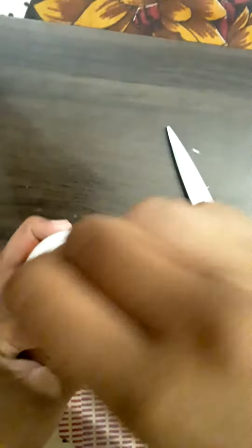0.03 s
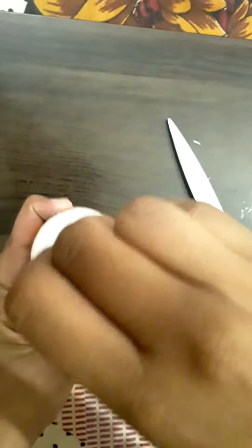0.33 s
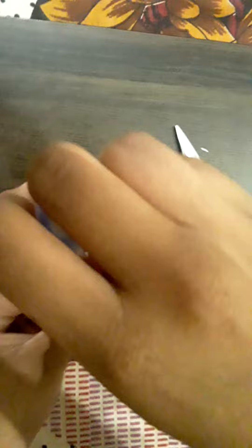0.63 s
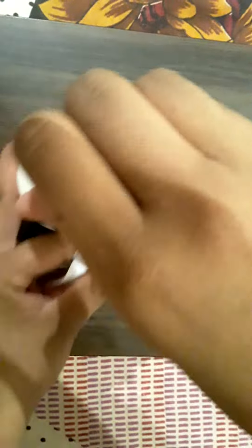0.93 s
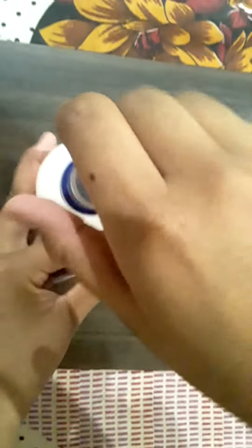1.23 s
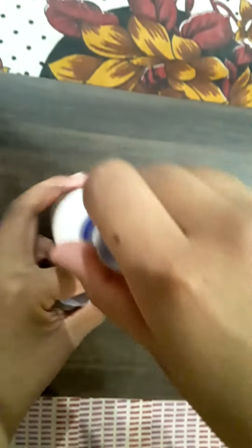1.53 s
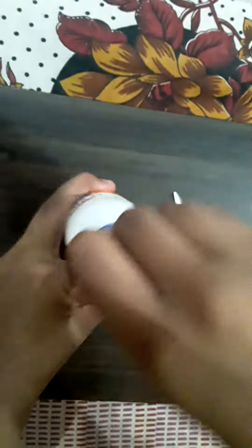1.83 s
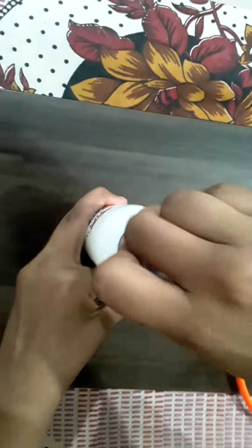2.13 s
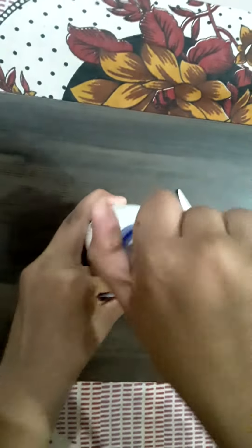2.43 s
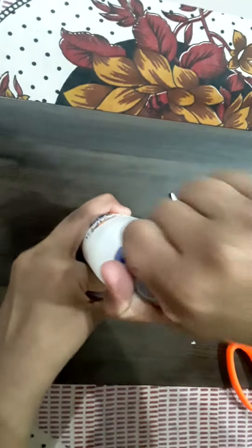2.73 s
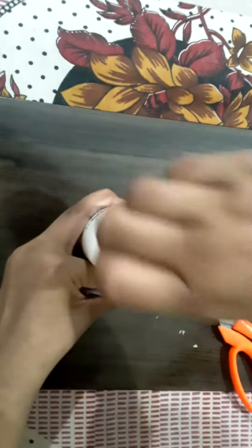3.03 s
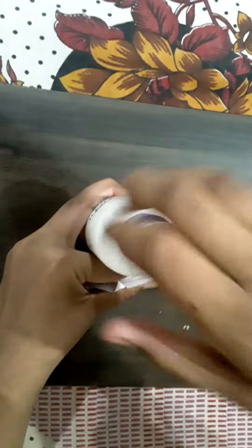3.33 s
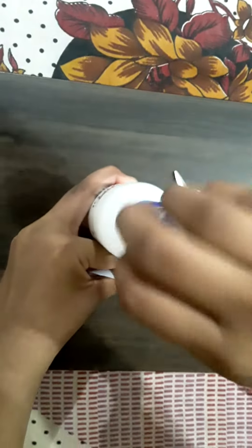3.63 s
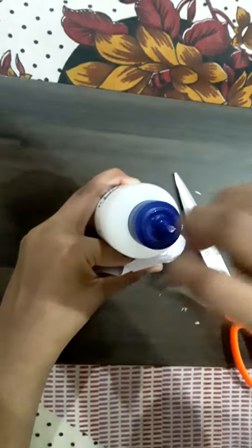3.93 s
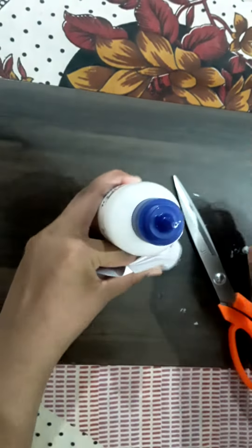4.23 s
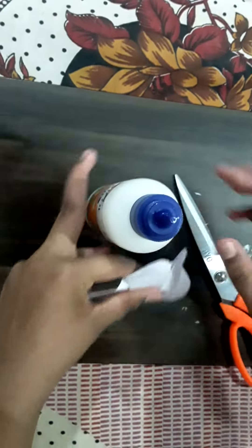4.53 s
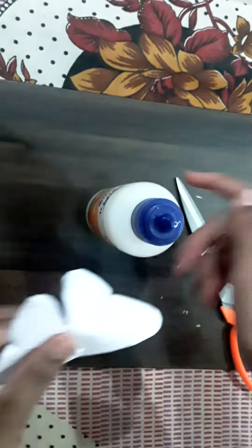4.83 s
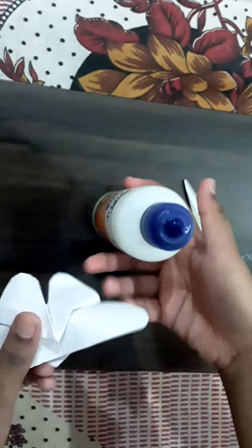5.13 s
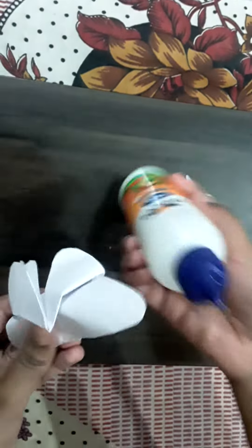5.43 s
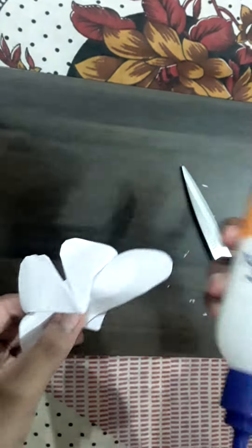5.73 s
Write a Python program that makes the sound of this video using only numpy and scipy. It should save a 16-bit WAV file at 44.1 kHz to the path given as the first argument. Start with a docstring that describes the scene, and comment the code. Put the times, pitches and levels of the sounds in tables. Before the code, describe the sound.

Hands quietly work paper against a plastic glue bottle, making tiny rubs, light clicks and soft bumps on a wooden tabletop over a fan-like hiss. Then steel scissors hit the table with a sharp clack, bounce and settle, echoing briefly in the bare room. The knock overloads the close microphone and the hiss drops, returning as faint high ticks, sliding paper and last finger rubs finish.

```python
"""A bare room with a steady airy hiss. Hands press paper onto a plastic glue bottle over a wooden table:
skin rubs in tiny slips, fingers tick on the plastic, and the bottle rocks on its base.
At four seconds scissors land with one sharp knock, steel and tabletop ringing, then rattle and settle.
The knock overloads the near microphone, whose gain control ducks the hiss for over a second.
Faint, very high ticks follow, the paper slides on the wood, and a few last rubs and ticks close."""
import sys
import numpy as np
from scipy import signal
from scipy.fft import rfft, irfft, next_fast_len
from scipy.io import wavfile
from scipy.ndimage import uniform_filter1d, minimum_filter1d

SR = 44100
rng = np.random.default_rng(int(sys.argv[2]) if len(sys.argv) > 2 else 0)


def put_to_file(sound):
    """Save the sound as 16-bit audio at rate SR, in the file named by the first command-line argument."""
    columns = np.atleast_2d(sound).T  # one column per channel
    safe = np.clip(columns, -1, 1)
    whole_steps = np.round(safe * 32767)
    wavfile.write(sys.argv[1], SR, whole_steps.astype(np.int16))


N = 259749

# Modes of the bottle, the tabletop and its low thump. Each row: pitch in Hz, width in Hz, level in dB.
BOTTLE_MODES = [(2617, 190, -16), (3476, 1200, -17.5), (4460, 1100, -16), (6160, 1330, 2), (7150, 310, 0.5)]
TABLE_MODES = [(200.7, 12, -22), (292.4, 41, -1.5), (380.5, 18, -5), (456, 58, 2), (629, 82, 5),
               (1008, 74, -3.5), (1373, 620, -13)]
THUMP_MODES = [(98, 96, -1.5), (163, 260, 2.2)]
# The tone of a hard contact. Each row: frequency in Hz, level in dB.
CRACK_EQ = [(100, -21.5), (400, -17.5), (750, -21.5), (1100, -5), (2000, -2), (3000, -1), (5000, 1),
            (7400, 0.5), (8400, -4), (9500, -13), (13000, -12.5), (15500, -12)]
# Each pair of sliding surfaces: favoured band in Hz, its lift in dB, treble shelf in dB.
SKIN_ON_PAPER = (4100, 2.4, 0)
SKIN_ON_BOTTLE = (3060, 16, -7.5)
PAPER_ON_WOOD = (6420, 8.9, 0)


def scissors(crack_db=-5, clack_db=-5, blur=1.5, skid_db=-22, skid_s=.0014, bounce_room_db=-13):
    """Steel blades and plastic handles strike the wood with a click, then ring briefly."""
    # The steel lands. Each row: start in seconds, then steel, tabletop, thump and room send in dB.
    knocks = [(3.994, 29, -7, -3, -9), (4.2538, 8, -19.5, -51, -8.5)]
    # The handles bounce. Each row: start in seconds, handle level in dB, tabletop level in dB.
    bounces = [(4.1385, -1.5, -18.5), (4.167, -8, -31), (4.1873, -8.5, -20), (4.306, -16.5, -25)]
    # Modes of the blades and the handles. Each row: pitch in Hz, width in Hz, level in dB.
    steel_modes = [(2820, 310, -17), (3490, 480, -13), (4490, 380, -10.5), (5040, 470, -8),
                   (5700, 300, -11), (6194, 450, -5.5), (7220, 516, 0), (7580, 475, -1.5),
                   (8140, 480, -17.5)]
    handle_modes = [(1098, 540, -40), (2030, 160, -4), (2800, 140, 4.5), (4000, 240, -6), (5030, 320, -18),
                    (6600, 1100, -5)]
    for start, db, table_db, thump_db, room_db in knocks:
        blow = amp(db + crack_db) * click() + amp(table_db) * ring(TABLE_MODES)
        blow += amp(thump_db) * ring(THUMP_MODES)
        skid = amp(skid_db) * burst(CRACK_EQ, skid_s)  # a faint scrape, heard only close by
        close = blow + amp(db) * (ring(steel_modes) + skid)
        send = amp(room_db) * (blow + amp(db) * wall_ring(steel_modes, blur))
        yield start, close, send
    for start, db, table_db in bounces:
        blow = amp(db + clack_db) * click() + amp(table_db) * ring(TABLE_MODES)
        skid = amp(skid_db + 10) * burst(CRACK_EQ, skid_s)
        close = blow + amp(db) * (ring(handle_modes) + skid)
        send = amp(bounce_room_db) * (blow + amp(db) * wall_ring(handle_modes, blur))
        yield start, close, send


def finger_ticks(snap_db=-2, ring_db=-4, grit_db=-17, grit_s=0.0011, room_db=-9):
    """The thin bottle ticks as fingers slip for an instant: a nail is bright, a fingertip dull."""
    # Each row: start in seconds, level in dB, treble shelf in dB.
    ticks = [(.245, -40, 1), (.4685, -39.5, -7), (0.667, -35, -3), (0.782, -30.5, 10.5), (1.829, -31, -14),
             (2.313, -41, -1), (2.774, -19, 10.5), (3.04, -37.5, -3), (3.164, -42, -2), (5.571, -41, 7),
             (5.6225, -45, -1)]
    for start, db, treble_db in ticks:
        tick = amp(ring_db) * ring(BOTTLE_MODES) + amp(snap_db) * click()
        tick += amp(grit_db) * burst(CRACK_EQ, grit_s)
        tick = amp(db) * treble_shelf(tick, treble_db, shelf_hz=9300)
        yield start, tick, amp(room_db) * tick


def bottle_rocking(scuff_db=-7, scuff_s=0.0044, plastic_db=-11, land_s=.006, thump_db=-16, room_db=-9):
    """The bottle's rim scuffs the wood, then its base lands and the table rings."""
    # Each row: start in seconds, contact level in dB, tabletop level in dB.
    nudges = [(3.7365, -29, -29), (3.785, -35, -52.5), (3.81, -31, -50.5)]
    # The tone of a soft scuff. Each row: frequency in Hz, level in dB.
    scuff_eq = [(100, -4), (600, -4.5), (1300, -0.5), (2500, -14.5), (4000, -12.5), (7500, -24),
                (9500, -42)]
    landing = ring(TABLE_MODES) + amp(thump_db) * ring(THUMP_MODES)
    for start, db, table_db in nudges:
        scuff = amp(scuff_db) * burst(scuff_eq, scuff_s)
        bump = amp(db) * (scuff + amp(plastic_db) * ring(BOTTLE_MODES))
        add(bump, land_s, amp(table_db) * landing)
        yield start, bump, amp(room_db) * bump


def rubbing(slips_per_s=900, smooth=0.54, grip_db=2.5, focus_octaves=0.45, room_db=-4,
            attack_s=0.032, release_share=0.36):
    """Each stroke is a swell of tiny slips under a wavering grip that takes hold, then eases off."""
    # The tone of sliding. Each row: frequency in Hz, level in dB.
    slide_eq = [(300, -22), (1500, -12.5), (3000, -2.5), (5000, 1.5), (6300, 2.5), (7400, 7.5),
                (8300, -8.5), (9400, -18.5), (13000, -8.5), (15800, -9.5)]
    # Each row: start in seconds, length in seconds, level in dB, pair of surfaces.
    strokes = [(0, 0.29, -69, SKIN_ON_PAPER), (0.518, 0.36, -56, SKIN_ON_PAPER),
               (0.685, 0.085, -54, SKIN_ON_PAPER), (0.852, .045, -55, SKIN_ON_PAPER),
               (0.876, 0.18, -65.5, SKIN_ON_PAPER), (2.6, 0.51, -67.5, SKIN_ON_PAPER),
               (2.936, 0.18, -61, SKIN_ON_BOTTLE), (3.146, 0.065, -58.5, SKIN_ON_BOTTLE),
               (3.44, 0.053, -57, SKIN_ON_BOTTLE), (3.641, 0.044, -53.5, SKIN_ON_BOTTLE),
               (4.733, 0.31, -55, PAPER_ON_WOOD), (5.329, 0.056, -54, SKIN_ON_PAPER),
               (5.422, 0.083, -55.5, SKIN_ON_PAPER), (5.498, 0.11, -57, SKIN_ON_PAPER),
               (5.598, 0.041, -52, SKIN_ON_PAPER)]
    hz = np.geomspace(100, SR / 2, num=200)
    t = np.arange(SR // 2) / SR
    for start, length, db, (focus_hz, focus_db, treble_db) in strokes:
        slips = rng.choice([-1., 1.], len(t)) * (rng.random(len(t)) < slips_per_s / SR)
        grip = amp(grip_db * unit(uniform_filter1d(rng.standard_normal(len(t)), size=500)))
        friction = grip * (unit(slips) + smooth * rng.standard_normal(len(t)))
        eq_db = curve(slide_eq, hz) + focus_db * np.exp(-(np.log2(hz / focus_hz) / focus_octaves) ** 2)
        grain = unit(colour(friction, np.c_[hz, eq_db], treble_db))
        swell = np.clip(np.minimum(t / attack_s, (length - t) / (release_share * length)), 0, 1)
        stroke = amp(db) * grain * swell
        yield start, stroke, amp(room_db) * stroke


def high_ticks(treble_db=12, shelf_hz=11000, grit_db=-14, grit_s=0.002, room_db=-6):
    """Faint, thin, very high ticks: a click and a little grit with the top treble lifted."""
    # Each row: start in seconds, level in dB.
    ticks = [(.877, -36), (4.4225, -27), (4.5423, -26), (4.785, -36)]
    for start, db in ticks:
        tick = click() + amp(grit_db) * burst(CRACK_EQ, grit_s)
        tick = amp(db - treble_db / 2) * treble_shelf(tick, treble_db, shelf_hz)
        yield start, tick, amp(room_db) * tick


def hand_pushes(pressing_s=(1, 3.6), count=12, light_db=-58, spread_db=2.5, table_db=-11, room_db=-10):
    """Hands bear down, thumping the table and barely ringing it; lighter pushes fall at random."""
    # Each row: start in seconds, thump level in dB.
    firm = [(.845, -45), (3.622, -44), (3.758, -41.5)]
    light = [(rng.uniform(*pressing_s), rng.normal(light_db, spread_db)) for _ in range(count)]
    thud = ring(THUMP_MODES) + amp(table_db) * ring(TABLE_MODES)
    for start, db in firm + light:
        yield start, amp(db) * thud, amp(room_db + db) * thud


def room(send, gap_s=0.0062, near_db=-15):
    """Faint scatter from nearby things, then dense echoes off hard walls; the highs die first."""
    # Each row: frequency in Hz, seconds to fall by 60 dB.
    decay_times = [(150, 1.46), (500, 0.8), (1500, 0.7), (3000, 0.66), (7000, 0.47), (14000, 0.33)]
    # The tone of the reverb. Each row: frequency in Hz, level in dB.
    reverb_eq = [(80, -28), (200, -11.5), (400, 1), (1500, 3.5), (4000, -2), (7300, 1.5), (10000, 5.5),
                 (14000, 3)]
    echoes = np.zeros(SR)
    slots = np.arange(8, SR - 8, 8)  # one echo somewhere in every eight samples
    echoes[slots + rng.integers(0, 8, len(slots))] = rng.choice([-1., 1.], len(slots))
    echoes[:round(gap_s * SR)] *= amp(near_db)
    hz, t, bands = signal.stft(echoes, SR, nperseg=256)
    fade = amp(-60 * t / curve(decay_times, hz)[:, None])
    tail = signal.istft(bands * fade, SR, nperseg=256)[1]
    return signal.fftconvolve(send, colour(tail / np.linalg.norm(tail), reverb_eq))[:N]


def room_air(level_db=-49.5, waver_db=0.68, waver_hz=8):
    """A steady rush of air, as from a fan, with two humps in its tone and a slight waver."""
    # Each row: frequency in Hz, level in dB.
    air_eq = [(25, -32), (65, -19), (100, -9), (160, -2.5), (260, -3.5), (430, 0), (580, -2.5), (750, -7.5),
              (1700, -8), (2300, -13), (5200, -22.5), (7500, -21), (9100, -45), (14000, -39)]
    # Each row: centre in Hz, width in Hz, lift in dB.
    humps = [(200.3, 22, 7.2), (1110, 206, 4.8)]
    hz = np.fft.rfftfreq(N, 1 / SR)
    humps_db = sum(db / (1 + (2 * (hz - centre) / width) ** 2) for centre, width, db in humps)
    rush = irfft(rfft(rng.standard_normal(N)) * amp(curve(air_eq, hz) + humps_db), N)
    waver = unit(irfft(rfft(rng.standard_normal(N)) * np.exp(-hz / waver_hz), N))
    return amp(level_db + waver_db * waver) * unit(rush)


def click():
    """The instant of a hard contact: one coloured impulse, peak 1."""
    impulse = colour(signal.unit_impulse(SR // 4), CRACK_EQ)
    return impulse / abs(impulse).max()


def ring(modes):
    """Damped modes struck together, peak 1; neighbours swing in opposite directions."""
    t = np.arange(SR // 4) / SR
    tone = sum((-1) ** k * amp(db) * np.exp(-np.pi * width * t) * np.sin(2 * np.pi * hz * t)
               for k, (hz, width, db) in enumerate(modes))
    return tone / abs(tone).max()


def wall_ring(modes, blur):
    """Each direction favours other partials, so the walls get broader peaks with the same energy."""
    broadened = ring(np.multiply(modes, [1, blur, 1]))
    return unit(broadened) * np.sqrt(np.mean(ring(modes) ** 2))


def burst(eq, decay_s):
    """The brief noise of two surfaces scraping, starting at about rms 1."""
    envelope = np.exp(-np.arange(SR // 4) / SR / decay_s)
    scrape = colour(rng.standard_normal(len(envelope)) * envelope, eq)
    return unit(scrape) * np.sqrt(np.mean(envelope ** 2))


def colour(x, eq, treble_db=0, shelf_hz=11000):
    """Minimum-phase EQ with a shelf on the top treble."""
    size = next_fast_len(len(x) + 4096)
    hz = abs(np.fft.fftfreq(size, 1 / SR))
    shelf_db = treble_db * (1 + np.tanh((hz - shelf_hz) / 700)) / 2
    log_gain = np.log(amp(curve(eq, hz) + shelf_db))
    response = np.exp(np.conj(signal.hilbert(log_gain)))
    return np.fft.ifft(np.fft.fft(x, size) * response).real[:len(x)]


def treble_shelf(x, treble_db, shelf_hz):
    """Lifts or dulls the top treble and leaves the rest flat."""
    return colour(x, [(1, 0)], treble_db, shelf_hz)


def curve(points, hz):
    """Reads a table on a log-frequency axis."""
    frequencies, values = np.transpose(points)
    return np.interp(np.log(hz + 1), np.log(frequencies + 1), values)


def amp(db):
    """Decibels to gain."""
    return 10 ** (np.asarray(db) / 20)


def unit(x):
    """Scales to rms 1."""
    return x / np.sqrt(np.mean(x ** 2) + 1e-20)


def add(mix, start_s, sound):
    """Lays a sound into the mix."""
    part = mix[max(round(start_s * SR), 0):][:len(sound)]
    part += sound[:len(part)]


def scene():
    """Every contact yields its start in seconds, close sound and room send; the air lies beneath."""
    direct, reverb_bus = np.zeros((2, N))
    for source in (scissors(), finger_ticks(), bottle_rocking(), hand_pushes(), high_ticks(), rubbing()):
        for start, close, send in source:
            add(direct, start, close)
            add(reverb_bus, start, send)
    return (direct + room(reverb_bus) + room_air())[None]


def record(dry, depth_db=11.5, hold_s=1.04, recover_db_per_s=26, cutoff_hz=15850):
    """Gain control ducks on overload, holds and recovers; a fast limiter and a low-pass follow."""
    peak = -minimum_filter1d(-abs(dry[0]), size=25)
    over_db = np.clip(20 * np.log10(peak + 1e-9), 0, depth_db)
    hold = round(hold_s * SR)
    held_db = -minimum_filter1d(-over_db, hold, origin=(hold - 1) // 2, mode="constant")
    recovery_db = np.arange(N) / SR * recover_db_per_s
    duck = amp(recovery_db - np.maximum.accumulate(held_db + recovery_db))
    limited_gain = uniform_filter1d(duck / np.maximum(duck * peak, 1), size=21)
    lowpass = signal.firwin(511, cutoff_hz, window=("kaiser", 9), fs=SR)
    return signal.oaconvolve(dry * limited_gain, lowpass[None], "same")


dry = scene()
out = record(dry)
put_to_file(out)
```